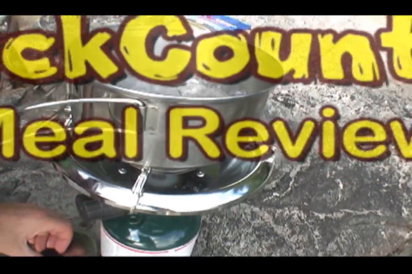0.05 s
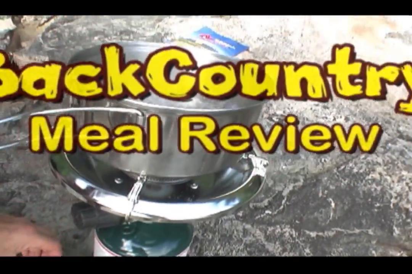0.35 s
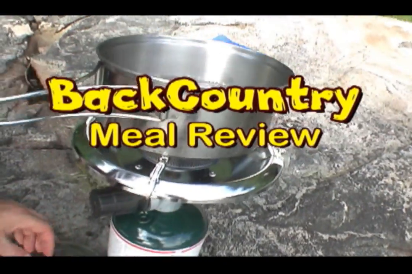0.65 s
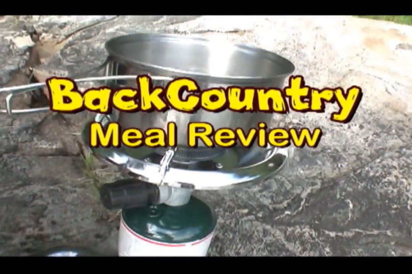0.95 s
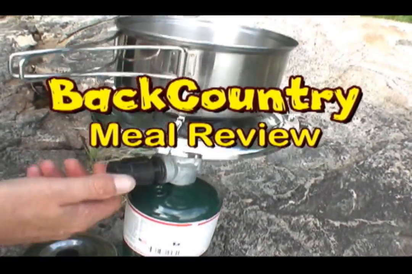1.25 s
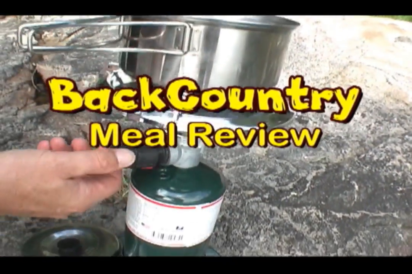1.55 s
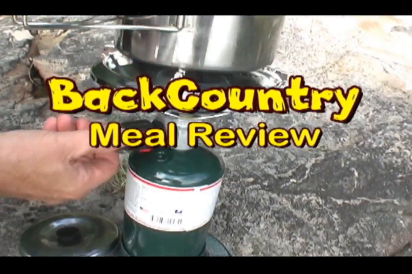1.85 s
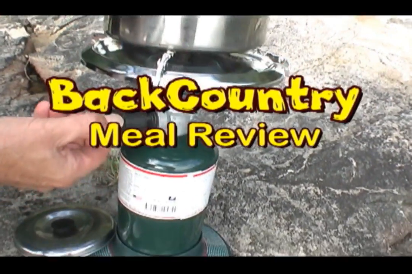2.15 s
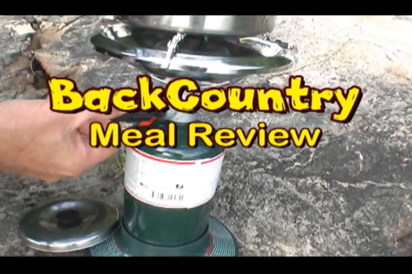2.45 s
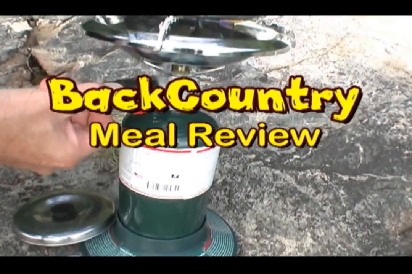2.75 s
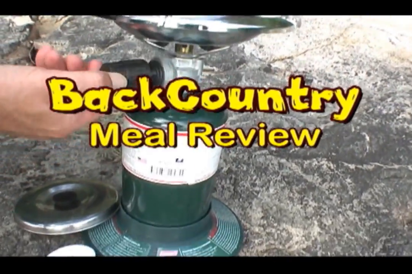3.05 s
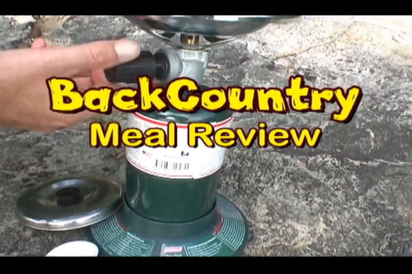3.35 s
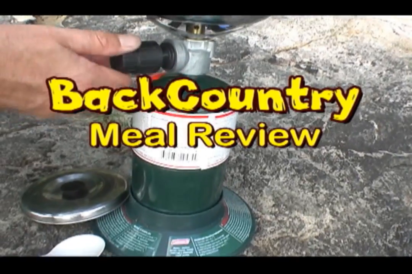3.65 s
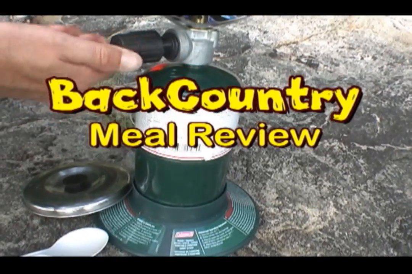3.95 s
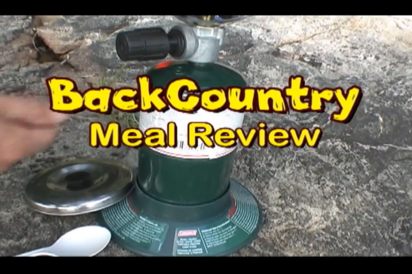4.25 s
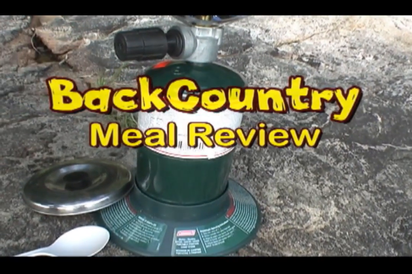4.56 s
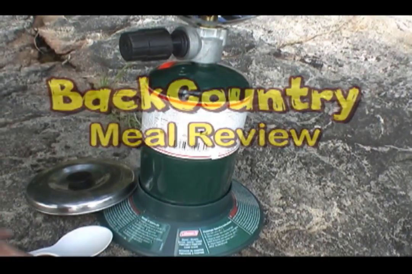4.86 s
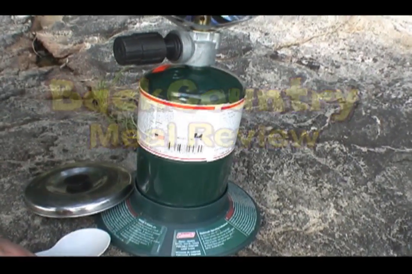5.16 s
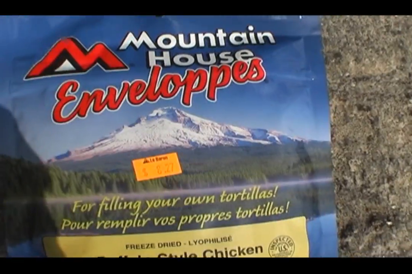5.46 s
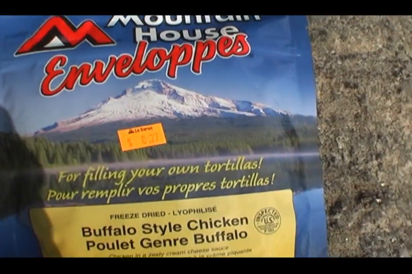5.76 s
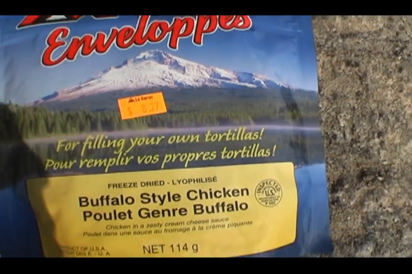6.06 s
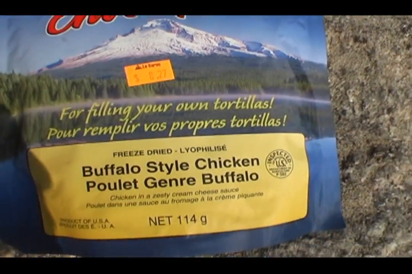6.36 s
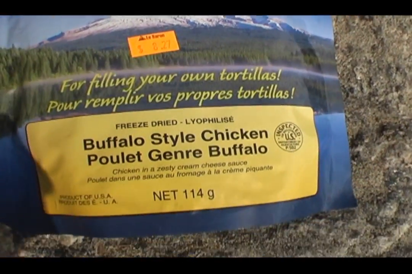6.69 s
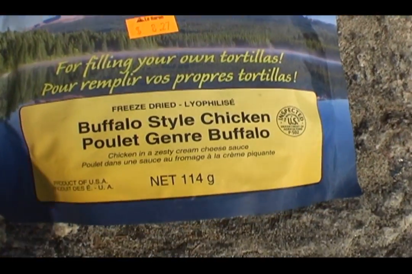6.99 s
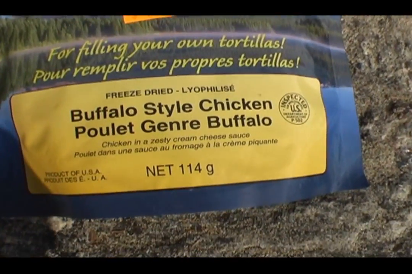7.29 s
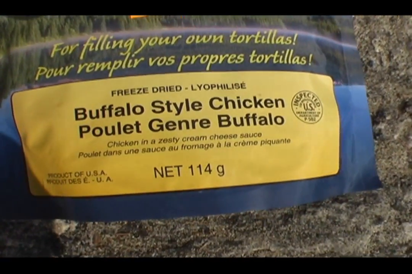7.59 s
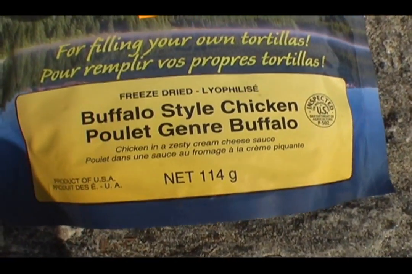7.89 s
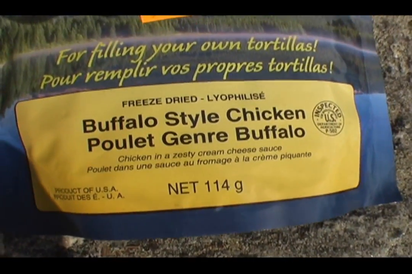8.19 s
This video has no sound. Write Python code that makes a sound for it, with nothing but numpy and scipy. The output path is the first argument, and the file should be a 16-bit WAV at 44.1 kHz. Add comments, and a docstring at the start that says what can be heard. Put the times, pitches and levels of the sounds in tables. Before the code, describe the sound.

A gas camp stove hisses under a pot and is turned off, followed by metal clanks and light rubbing.

```python
"""A gas camp stove roars and hisses under a steel pot, outdoors, until a hand closes the valve.
The flame is low, fluttering turbulence; the gas jet hisses and sings in the mixing tube.
Pot, lid, wire handle and spoon ring in their modes as they clank, chink and tap, and the stove is knocked.
Water slops as ringing bubbles, and light rubbing rasps and swishes on the steel.
Nearby rock scatters a short reflection, over a faint open-air background."""
import sys
import numpy as np
from scipy import signal
from scipy.fft import rfft, irfft, next_fast_len
from scipy.io import wavfile
from scipy.ndimage import uniform_filter1d

SR = 44100
rng = np.random.default_rng(int(sys.argv[2]) if len(sys.argv) > 2 else 0)


def master_out(mix):
    """Clip the mix to full scale and print it as 16-bit PCM to the path in sys.argv[1]."""
    frames = np.transpose(np.atleast_2d(mix))
    ceiling = np.clip(frames, -1, 1)
    pcm = np.round(ceiling * 32767).astype(np.int16)
    wavfile.write(sys.argv[1], SR, pcm)


N = 362943


def undb(db):
    """Decibels to gain."""
    return 10 ** (np.asarray(db) / 20)


def unit(x):
    """Scale to rms 1."""
    return x / np.sqrt(np.mean(x ** 2) + 1e-20)


def shape(x, response):
    """Filter by a response given as a function of frequency."""
    size = next_fast_len(x.shape[-1], real=True)
    f = np.maximum(np.arange(size // 2 + 1) * SR / size, 1)
    return irfft(rfft(x, size) * response(f), size)[..., :x.shape[-1]]


def colour(x, points, tilt_db=0):
    """EQ by a curve of (frequency [Hz], level [dB]), tilted per octave about 2 kHz."""
    hz, db = np.transpose(points)
    return shape(x, lambda f: undb(np.interp(np.log(f), np.log(hz), db)
                                   + tilt_db * np.log2(np.maximum(f, 200) / 2000)))


def resonate(x, peaks):
    """Pass through parallel resonances given as (frequency [Hz], width [Hz], level [dB])."""
    def power(f):
        return sum(undb(2 * db) / (1 + ((f * f - hz * hz) / (f * width)) ** 2) ** 2
                   for hz, width, db in peaks)
    return unit(shape(x, lambda f: np.sqrt(power(f))))


def notch_comb(x, hz, depth, sharpness):
    """Narrow dips at every multiple of hz."""
    return shape(x, lambda f: 1 - depth * (1 - sharpness) / (np.exp(2j * np.pi * f / hz) - sharpness))


def walk(rate):
    """Random levels held 1 / rate s and slewed twice; spread near 1."""
    hold = int(SR / rate)
    steps = np.repeat(rng.standard_normal(N // hold + 1), hold)
    return 1.3 * uniform_filter1d(uniform_filter1d(steps, hold), hold)[:N]


def fade(t, t60):
    """Exponential decay by 60 dB in t60."""
    return np.exp(-np.log(1000) * t / t60)


def swells(rows):
    """Envelope of bell-shaped swells given as (centre [s], level [dB], half length [s])."""
    t = np.arange(N) / SR
    return sum(undb(db) * np.exp(-((t - s) / half) ** 2 / 2) for s, db, half in rows)


def spell(start, end, attack, release):
    """Envelope that rises smoothly up to start, holds and falls away after end."""
    t = np.arange(N) / SR
    return np.exp(-(np.maximum(start - t, 0) / attack) ** 2 - (np.maximum(t - end, 0) / release) ** 2)


def ring(modes, tilt_db=0):
    """One blow on an object: each mode gets a random share, as if by where the blow lands."""
    t, out = np.arange(SR // 2) / SR, 0
    for (hz, db, t60), (share_db, sign) in zip(modes, rng.standard_normal((len(modes), 2))):
        gain = np.sign(sign) * undb(db + share_db + tilt_db * np.log2(hz / 2000))
        out = out + gain * np.sin(2 * np.pi * hz * t) * fade(t, t60)
    return out / np.sqrt(np.sum(undb(np.array(modes)[:, 1]) ** 2) / 2)


def burst(points, t60, tilt_db=0):
    """The dense, quickly damped vibration at a contact."""
    t = np.arange(SR // 2) / SR
    return unit(colour(rng.standard_normal(len(t)), points, tilt_db)) * fade(t, t60)


def add(out, s, x, pan_db=0):
    """Mix a mono sound in at s seconds, left minus right by pan_db."""
    i = int(np.clip(s * SR, 0, N - 1))
    out[:, i:i + len(x)] += x[:N - i] * undb(np.array([[pan_db], [-pan_db]]) / 2)


# stereo width of turbulence: (frequency [Hz], side minus mid [dB])
STEREO_WIDTH = [(30, 4), (70, -8.5), (150, -11), (600, -9), (5000, -16.5), (9000, -12), (14000, -2.5)]


def wash(points=((100, 0), (16000, 0))):
    """Stereo turbulence, flat unless given an EQ curve, widest at the two ends of the spectrum."""
    mid, side = colour(rng.standard_normal((2, N)), points)
    return (mid + colour(side, STEREO_WIDTH) * np.array([[1], [-1]])) / np.std(mid)


# hollow tones in the ambience: (frequency [Hz], width [Hz], level [dB])
HOLLOW_TONES = [(622, 23, 10.5), (1040, 34, -30), (1563, 93, 0), (2172, 50, 3.5), (3140, 170, -7),
                (4280, 110, -1), (5930, 25, 1.5), (8200, 60, -24), (7700, 70, -34)]


def open_air():
    """A faint, slowly swelling bed of air with a hollow tinge."""
    hollow = resonate(wash(), HOLLOW_TONES)
    air = wash([(15, -51), (25, -9.5), (149, 2), (317, -9), (840, 2), (1100, -11), (1230, 6.5),
                (1480, -28), (1610, -41), (1790, -3), (2160, -10), (2480, -24), (6050, -20),
                (10100, -46), (16000, -39)])
    return (undb(-54.5) * air + undb(-58) * hollow) * undb(0.32 * walk(1.15))


# rasp of friction on steel: (frequency [Hz], level [dB])
RASP_EQ = [(180, -41), (300, -3.5), (624, -3.5), (725, -6.5), (1080, 2.5), (1320, -4), (1580, -3),
           (2980, -6.5), (3350, -7.5), (3640, -8.5), (5700, -3.5), (10200, -10.5), (16000, -22)]
# pot wall tones that rubbing brings out: (frequency [Hz], level [dB])
WALL_TONES = [(632, -3), (1111, -7), (1216, -7), (1614, -7), (1906, -8), (2802, -2), (2971, -8), (3386, 0),
              (3443, 6), (4997, -6), (5549, -5), (6169, -7), (6745, -5), (7865, -10)]
# spells of rubbing: (start [s], end [s], level [dB], wall tone share [dB])
RUBS = [(3.684, 4.108, -48, -25), (4.358, 5.94, -52.5, -20.5), (6.13, 6.447, -50.5, -10.5),
        (6.6, 7.33, -48.5, -7), (7.522, 7.958, -44.5, -14), (8.095, 8.224, -54, -17)]


def rubbing():
    """Light rubbing catches and slips and keeps the wall tones ringing."""
    pressure_db = 1.9 * walk(70)
    rasp = unit(wash(RASP_EQ) * undb(pressure_db + 2 * walk(900)))
    wall = ring([(hz, db, 0.3) for hz, db in WALL_TONES])
    tones = signal.fftconvolve(rasp, wall[None] / np.sqrt(np.sum(wall ** 2)), axes=1)[:, :N]
    out = np.zeros((2, N))
    for start, end, db, tones_db in RUBS:
        envelope = undb(db) * spell(start, end, attack=0.076, release=0.14)
        out += envelope * (undb(-0.5) * rasp + undb(tones_db) * tones)
    return out


# tone of a rubbing stroke: (frequency [Hz], level [dB])
SWISH_EQ = [(300, -28), (1500, -9), (2800, 8), (4000, 2), (5600, 8), (7000, 2), (10000, -3), (13000, -18),
            (16000, -28)]
# rubbing strokes: (centre [s], level [dB], half length [s], tilt [dB/octave])
SWISHES = [(.261, -24.5, 0.012, -3), (5.213, -41, 0.011, -1.5), (6.096, -50, 0.0068, 4),
           (6.36, -48, .014, 3), (6.569, -44.5, 0.014, 2), (6.697, -48, 0.041, 4), (6.771, -46, 0.0093, 6),
           (7.06, -43.5, 0.011, 2), (7.131, -44.5, 0.0075, 6), (7.195, -46, 0.0095, 7),
           (7.313, -43.5, 0.025, 11), (7.449, -44, .012, 6), (7.544, -39.5, .008, 4),
           (7.574, -43.5, 0.066, 7.5), (7.813, -44, 0.048, 14)]
# thin squeaks: (centre [s], level [dB], half length [s])
SQUEAKS = [(6.68, -48, 0.025), (6.775, -45.5, .012), (6.89, -48, .018)]


def swishes():
    """The rubbing swells into broad swishes and short strokes, and squeaks thinly where it catches."""
    out, t = np.zeros((2, N)), np.arange(SR // 2) / SR
    for s, db, half, tilt_db in SWISHES:
        start = max(s - 0.25, 0)
        swell = np.exp(-((start + t - s) / half) ** 2 / 2)
        friction = unit(colour(rng.standard_normal(len(t)), SWISH_EQ, tilt_db))
        add(out, start, undb(db) * swell * friction, pan_db=4)
    squeak = resonate(rng.standard_normal(N), [(5550, 780, -1), (8000, 500, -10)])
    add(out, 0, squeak * swells(SQUEAKS), pan_db=1)
    return out


def bubble(hz, t60, glide):
    """A pocket of air rings and shifts in pitch as it nears the surface."""
    t = np.arange(int(SR * min(t60, 0.06))) / SR
    phase = 2 * np.pi * np.cumsum(hz * 2 ** (glide * t)) / SR
    attack = 1 - np.exp(-t / 0.00035)
    return np.sqrt(2) * np.sin(phase) * fade(t, t60) * attack


# single plops: (time [s], relative level [dB], pitch [Hz], t60 [s], glide [octaves/s])
PLOPS = [(.287, -25, 1514, 0.028, 9), (3.195, -38, 1320, 0.031, -9.5), (3.219, -35, 1080, 0.023, 9),
         (3.278, -25.5, 950, 0.011, 9), (3.278, -32.5, 1700, 0.018, 9), (3.766, -40.5, 800, 0.12, 20),
         (3.784, -43, 1250, .05, 32.5), (4.45, -41, 1024, 0.07, 6), (6.97, -38.5, 1107, 0.069, -1),
         (6.997, -32.5, 1510, 0.018, 10)]
# slops in the pot: (centre [s], level [dB], half length [s])
SLOPS = [(.26, -43.5, 0.1), (.55, -40.5, 0.051), (3.27, -40, 0.057), (3.42, -47, 0.064), (3.72, -51, 0.12),
         (4.75, -60.5, 0.22), (7.0, -54, 0.08)]


def water():
    """A few clear plops over a blur of tiny bubbles that come in quick laps."""
    plops, blur = np.zeros((2, N)), np.zeros((2, N))
    for s, db, hz, t60, glide in PLOPS:
        add(plops, s, undb(db + 5) * bubble(hz, t60, glide))
    count = 7000
    for s, (pitch, size, side) in zip(rng.uniform(0, N / SR, count), rng.standard_normal((count, 3))):
        hz = 1250 * 2 ** (0.47 * np.clip(pitch, -2, 2))
        add(blur, s, undb(1.5 * size) * bubble(hz, t60=0.007, glide=6), pan_db=side)
    laps = undb(2 * walk(70))
    return plops + unit(blur * laps) * swells(SLOPS)


# transient of a light contact: (frequency [Hz], level [dB])
TICK_EQ = [(100, -26), (700, -2), (2000, 2), (3500, 2.5), (6500, -1.5), (10000, -8.5), (16000, -31)]
# wire handle modes: (frequency [Hz], level [dB], t60 [s])
HANDLE_MODES = [(1174, -14, .14), (2029, -14, .18), (2655, -10, .15), (3400, -9, .12), (4030, -7, .05),
                (5609, -9, .07), (6433, 0, .065), (6405, -4, .055), (6500, -3, .05), (6640, -4, .04),
                (8120, -7, .03), (8273, -1, .04), (10130, -14, .05), (11400, -16, .04)]
# handle chinks: (time [s], contact level [dB], ring level [dB])
CHINKS = [(0.8125, -9.5, -17), (.8200, -16, -24), (.8430, -26, -17), (.8475, -24, -19.5), (.8690, -23, -26),
          (.8805, -25, -26), (0.8907, -16.5, -25.5), (.899, -32, -27), (0.9457, -29.5, -37)]
# tone of the handle's hinge: (frequency [Hz], level [dB])
HINGE_EQ = [(2000, -36), (4400, -22), (4950, 10), (5500, -10), (6800, 2), (7400, -3), (8200, 2),
            (9500, -12), (16000, -21)]
# hinge creaks: (time [s], level [dB])
CREAKS = [(0.6084, -28), (0.621, -21.5), (0.639, -23)]
# spoon modes: (frequency [Hz], level [dB], t60 [s])
SPOON_MODES = [(1487, -5.5, 0.072), (4034, 5, 0.034), (6470, 1.5, 0.037), (8280, -4, 0.046),
               (9000, -5, 0.057), (9900, -4, 0.026)]
# spoon taps: (time [s], contact level [dB], ring level [dB])
TAPS = [(5.3716, -39, -26), (5.426, -30.5, -31.5), (7.988, -52, -48), (7.999, -26, -33.5)]
# ticks and scuffs, the first a bright tick that lands with the big pot clank: (time [s], level [dB], t60 [s],
# tilt [dB/octave])
TICKS = [(0.3711, -6.5, 0.013, 12), (3.2258, -23.5, 0.028, 12), (3.248, -31, 0.079, 10.5),
         (3.434, -32, 0.061, 9), (3.926, -27.5, 0.026, 1.5), (4.597, -41.5, 0.16, 4.5),
         (5.138, -41, 0.032, 11), (5.233, -35, 0.062, -0.5), (5.564, -41, 0.13, 1.5),
         (5.7483, -33, 0.018, 5), (5.761, -39, 0.059, 2), (6.551, -36, 0.043, 6), (6.97, -31, .008, -5),
         (6.9967, -27, 0.0069, 5), (7.2495, -31.5, 0.009, 12), (7.526, -33.5, 0.057, 9)]


def cookware():
    """The handle chinks and creaks, the spoon taps and small things tick as they are handled; a bright tick
    lands with the big pot clank."""
    out = np.zeros((2, N))
    for s, db, ring_db in CHINKS:
        contact = undb(db) * burst(TICK_EQ, t60=0.018, tilt_db=7)
        add(out, s, contact + undb(ring_db) * ring(HANDLE_MODES), pan_db=2.5)
    for s, db in CREAKS:
        add(out, s, undb(db) * burst(HINGE_EQ, t60=0.036), pan_db=2)
    for s, db, ring_db in TAPS:
        contact = undb(db) * burst(TICK_EQ, t60=0.018)
        add(out, s, contact + undb(ring_db) * ring(SPOON_MODES), pan_db=3.5)
    stray_times = rng.uniform(2.2, N / SR, size=14)
    strays = [(s, -41.5 - 1.5 * rng.standard_normal(), 0.055, 2.5) for s in stray_times]
    for s, db, t60, tilt_db in TICKS + strays:
        add(out, s, undb(db) * burst(TICK_EQ, t60, tilt_db), pan_db=3)
    return out


# dull transient of steel on steel: (frequency [Hz], level [dB])
CLANK_EQ = [(60, -34), (400, -78), (580, 5), (780, -13.5), (1150, 4.5), (1550, 1), (1850, 0), (2300, 0.5),
            (3400, -6.5), (5000, -6.5), (8500, -14.5), (12000, -29.5), (16000, -49)]
# steel pot modes: (frequency [Hz], level [dB], t60 [s])
POT_MODES = [(565, -2, .06), (1110, 1.5, .045), (1190, 5, .055), (1626, -3, .14), (1717, -7, .22),
             (1793, -4, .11), (2020, -5, .08), (2283, -11, .13), (2966, 4.5, .19), (4576, -1, .15),
             (4633, 2.5, .18), (4660, -4, .15), (7601, -6.5, .17), (8145, -13, .13), (10720, -16, .19),
             (11740, -22, .18)]
# lid modes: (frequency [Hz], level [dB], t60 [s])
LID_MODES = [(640, -10, .12), (1205, -16, .9), (1460, -4, .06), (1690, -4, .08), (1760, -4, .11),
             (1850, 0, .09), (1905, 0, .1), (2670, 0, .1), (2750, -1, .1), (2968, -9, .5), (4107, -10, .12),
             (4530, -11, .08), (5490, -3, .09), (5610, -6, .07), (6230, -11, .05), (8130, -6, .035)]


def clank(db, t60, tilt_db, pot_db, lid_db):
    """Steel on steel sets pot and lid ringing; more tilt gives a harder, brighter hit."""
    contact = undb(db) * burst(CLANK_EQ, t60, tilt_db)
    pot = undb(pot_db) * ring(POT_MODES, tilt_db / 2)
    lid = undb(lid_db) * ring(LID_MODES, tilt_db / 2)
    return contact + pot + lid


# hits: (time [s], contact level [dB], contact t60 [s], tilt [dB/octave], pot ring [dB], lid ring [dB])
CLANKS = [(.012, -47, 0.024, 2, -30.5, -66), (.3713, 1, 0.018, -2, -6, -42),
          (.392, -25, .025, 1, -23.5, -39), (5.619, -11, 0.031, 1, -62, -33.5),
          (5.65, -30, 0.043, -3, -62, -34), (5.654, -28, .04, -2.5, -59, -34.5),
          (5.7962, -24, 0.036, 4.5, -52, -21.5), (5.8104, -15, 0.05, -0.5, -32, -19),
          (5.817, -14.5, 0.041, 6.5, -47, -15), (5.8271, -12, 0.052, 6.5, -28, -18),
          (5.944, -29, 0.023, 7, -36, -53), (8.121, -23.5, 0.016, 0.5, -62, -43)]
# the lid settling: (start [s], length [s], first bounce level [dB])
RATTLES = [(5.847, .08, -25), (5.936, .03, -29.5)]


def pot_and_lid():
    """Pot and lid clank together; the lid rattles on in quick, weakening bounces."""
    out, pan_db = np.zeros((2, N)), 2.4
    gap_s, jitter_s, fall_db_per_s = 0.0125, 0.0015, 110
    # at first the pot's strongest mode is still ringing from an earlier touch
    strongest = max(POT_MODES, key=lambda mode: mode[1])
    add(out, 0, undb(-32.5) * ring([strongest]), pan_db)
    for s, db, t60, tilt_db, pot_db, lid_db in CLANKS:
        add(out, s, clank(db, t60, tilt_db, pot_db, lid_db), pan_db)
    for start, length, first_db in RATTLES:
        for after in np.arange(0, length, gap_s):
            db = first_db - fall_db_per_s * after
            bounce = clank(db, t60=0.042, tilt_db=-1, pot_db=db - 19, lid_db=db)
            add(out, start + after + jitter_s * rng.standard_normal(), bounce, pan_db)
    return out


# stove body modes: (frequency [Hz], level [dB], t60 [s])
STOVE_MODES = [(595, -4.5, 0.052), (643.4, 2.5, 0.083), (1223, -4, 0.029), (2195, -14, 0.043),
               (2590, -11.5, 0.024), (3230, -18.5, 0.053)]
# knocks on the stove: (time [s], relative ring level [dB], relative chatter level [dB])
KNOCKS = [(2.545, -29.5, -65), (2.892, -20, -35.5), (2.935, -31, -65), (3.668, -41, -61),
          (3.834, -27, -33.5), (3.862, -31.5, -36), (4.080, -24.5, -29.5), (4.112, -30.5, -33),
          (4.451, -40, -76)]


def knocks():
    """Soft knocks ring the stove low; a loose joint chatters high for a few bounces."""
    out, t = np.zeros((2, N)), np.arange(SR // 2) / SR
    joint_eq = [(1500, -14), (2400, -9), (4300, -30), (4850, 9.5), (5400, -25), (6500, -16),
                (12000, -25), (16000, -52)]
    attack_s, bounce_s = 0.0052, 0.0068
    for s, db, chatter_db in KNOCKS:
        body = ring(STOVE_MODES) * (1 - np.exp(-t / attack_s))
        chatter = burst(joint_eq, t60=0.099) * fade(t % bounce_s, t60=0.03)
        add(out, s, undb(db + 8) * body + undb(chatter_db + 4) * chatter)
    # the gas bottle thuds once on its base
    bottle_eq = [(30, -12), (80, -8), (200, 4), (380, -9), (600, -35), (3000, -60)]
    add(out, 3.921, undb(-40.5) * burst(bottle_eq, t60=0.13))
    return out


# fingers work the valve: (centre [s], level [dB], half length [s])
GRIPS = [(3.66, -48, 0.081), (4.01, -43, 0.059)]


def valve():
    """Turning the knob rubs the stove's low resonance into a faint hum."""
    return resonate(rng.standard_normal(N), [(652, 44, 9), (2280, 150, -22)]) * swells(GRIPS)


# roar of the flame: (frequency [Hz], level [dB])
FLAME_EQ = [(15, -49), (25, -29), (89, -5.5), (188, 1), (294, -5), (521, -2), (592, 0), (644, -3.5),
            (905, -9), (1270, -12), (1670, -20.5), (1940, -13.5), (2670, -29), (3670, -16), (4000, -27),
            (5200, -23), (8800, -120)]
# hiss of the gas jet: (frequency [Hz], level [dB])
JET_EQ = [(900, -4.5), (2000, -3), (3700, -4), (4050, -5.5), (4500, -1.5), (6700, -1.5), (7500, -3.5),
          (8400, -3.5), (10000, -4.5), (11100, -8), (11600, -9), (13000, -15.5), (14500, -19), (16000, -20)]
# mixing tube resonances: (frequency [Hz], width [Hz], level [dB])
TUBE_PEAKS = [(5750, 500, 2.5), (6750, 300, -8), (8400, 950, -5.5), (10950, 560, -7), (13000, 900, -14)]
# level ride of the gas flow while the valve is open: (time [s], level [dB])
GAS_FLOW = [(0, 0.5), (1.1, -1), (1.7, -1.5), (2.25, -1.5), (2.65, 3), (2.9, 2)]


def burner():
    """The flame flutters low while the jet hisses and sings in the tube, until the valve shuts."""
    settle_s, shut_s, turn_s, flame_out_s = 2.06, 2.91, 0.14, 3.54
    bleed_db_per_s, die_db_per_s = 17, 62
    t = np.arange(N) / SR
    flow_db = np.interp(t, *np.transpose(GAS_FLOW)) - die_db_per_s * np.maximum(t - flame_out_s, 0)
    early = np.maximum(1 - t / settle_s, 0)  # the jet starts as plain hiss and settles into singing
    shut = np.clip((t - shut_s) / turn_s, 0, 1)
    bleed_db = bleed_db_per_s * np.maximum(t - shut_s - turn_s, 0)  # the remaining gas runs out
    roar = wash(FLAME_EQ) * undb(-41.5 - 12.5 * shut + 1.2 * walk(25))
    hiss = wash(JET_EQ) * undb(-43.5 + 6 * early - 4.5 * shut + 0.5 * walk(16))
    tube = resonate(wash(), TUBE_PEAKS) * undb(-42.5 - 5.5 * early - 27 * shut + 1.7 * walk(9.4))
    return (roar + (hiss + tube) * undb(-bleed_db)) * undb(flow_db)


def scene():
    """Everything is close; the rock around scatters a short, faint reflection of the handling."""
    low_cut = signal.butter(1, 330, "high", fs=SR, output="sos")  # the steel sounds carry little bass
    steel = signal.sosfilt(low_cut, pot_and_lid() + cookware())
    handling = steel + knocks() + water() + valve()
    rock_eq = [(100, -4), (650, 1.5), (1500, 9.5), (8000, -2), (16000, 6.5)]
    rock = np.array([burst(rock_eq, t60=0.026) for _ in range(2)])
    reflection = signal.fftconvolve(handling, rock / np.sqrt(np.sum(rock ** 2) / 2), axes=1)[:, :N]
    return handling + undb(-12) * reflection + burner() + rubbing() + swishes() + open_air()


def record(dry):
    """Two combs of narrow notches colour the mix, soft clipping rounds the peaks and the top is cut."""
    comb_hz, top_hz = 599.4, 16100
    notched = notch_comb(dry, comb_hz, depth=0.22, sharpness=0.66)
    notched = notch_comb(notched, comb_hz / 2, depth=0.7, sharpness=0.72)
    high_cut = signal.ellip(10, 0.2, 80, top_hz, fs=SR, output="sos")
    return signal.sosfilt(high_cut, np.tanh(notched))


dry = scene()
out = record(dry)
master_out(out)
```